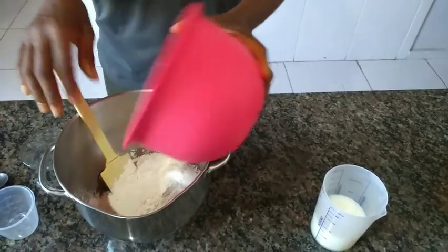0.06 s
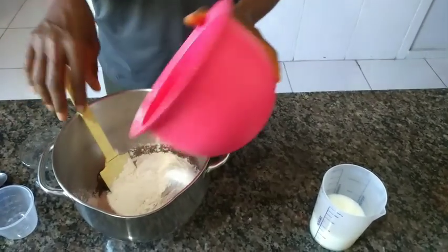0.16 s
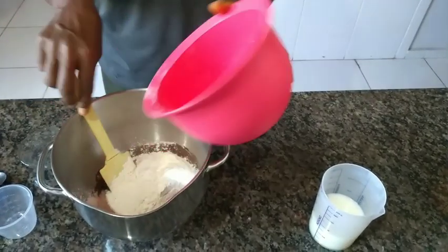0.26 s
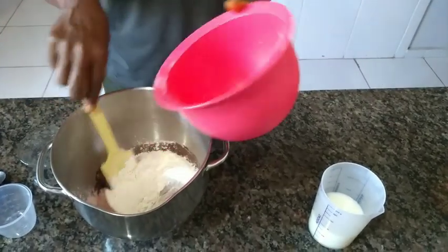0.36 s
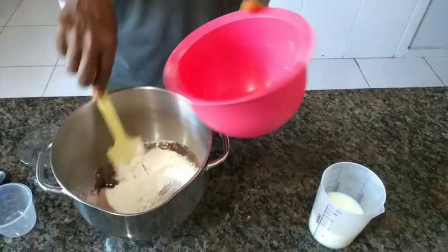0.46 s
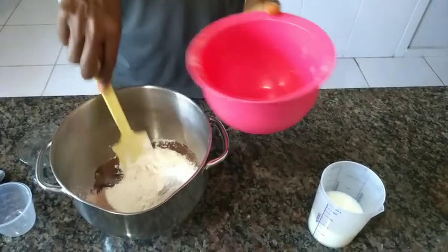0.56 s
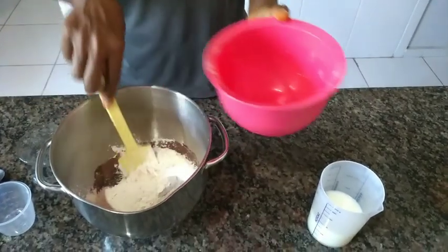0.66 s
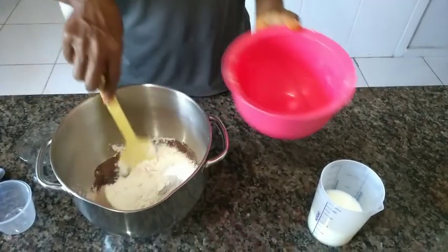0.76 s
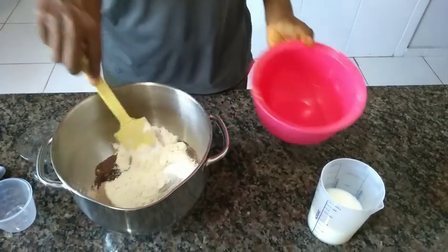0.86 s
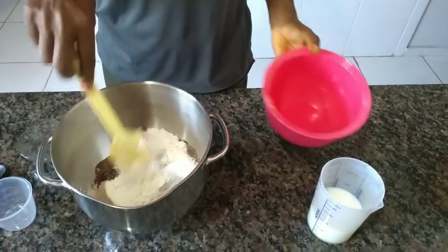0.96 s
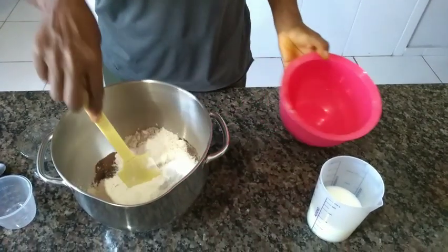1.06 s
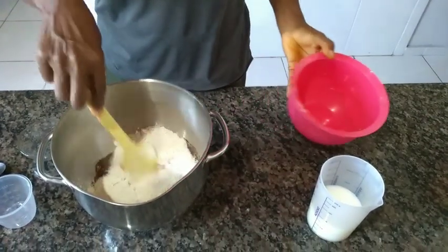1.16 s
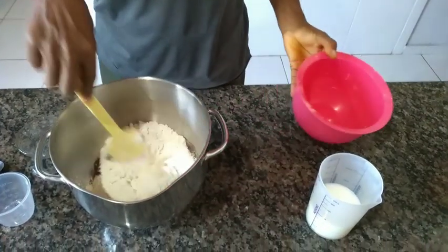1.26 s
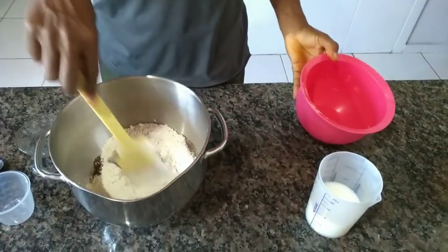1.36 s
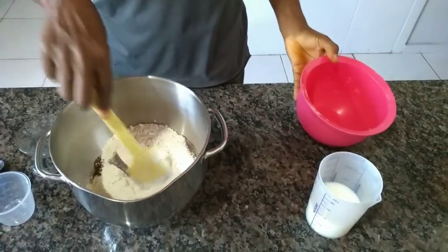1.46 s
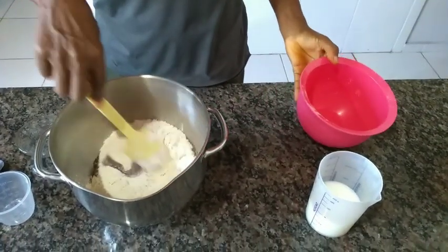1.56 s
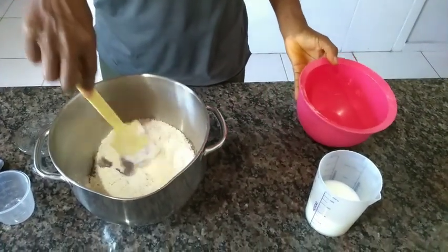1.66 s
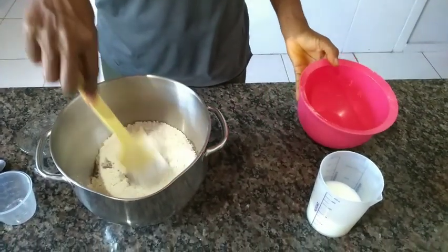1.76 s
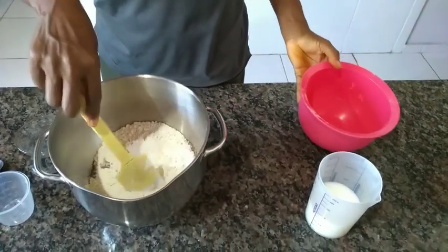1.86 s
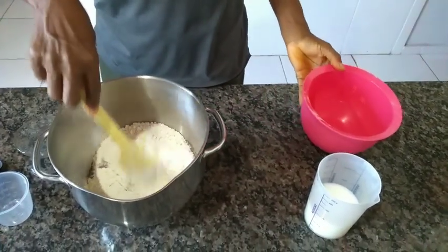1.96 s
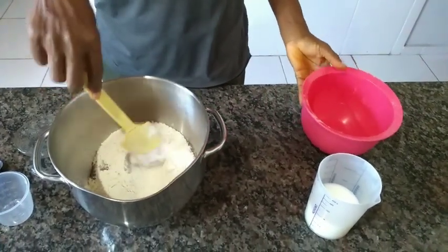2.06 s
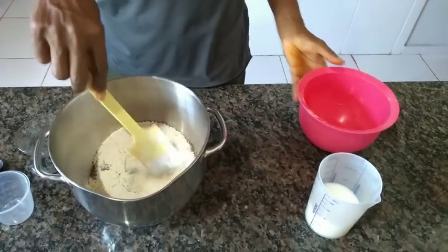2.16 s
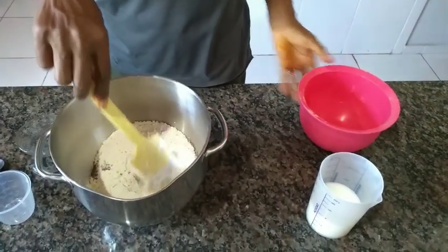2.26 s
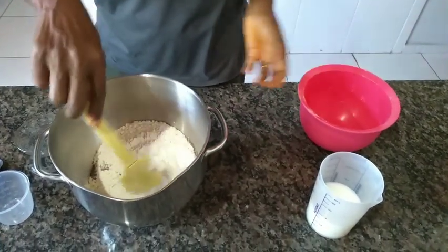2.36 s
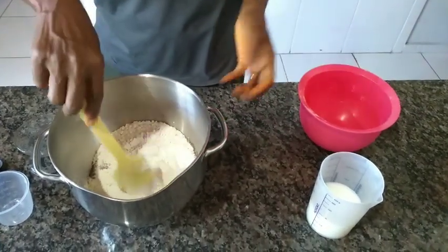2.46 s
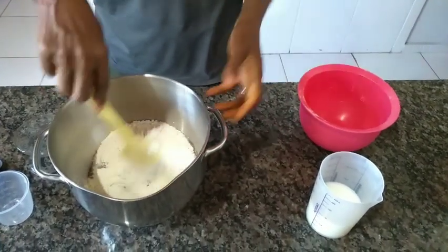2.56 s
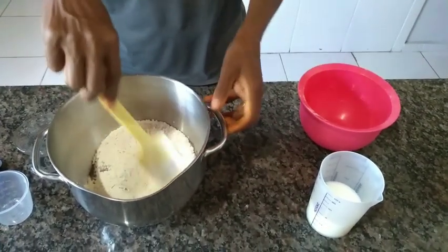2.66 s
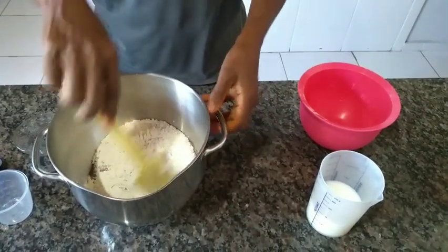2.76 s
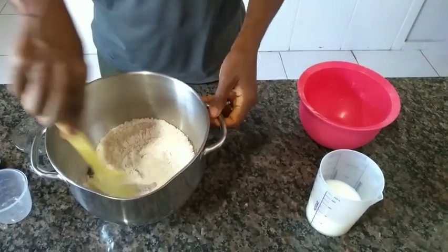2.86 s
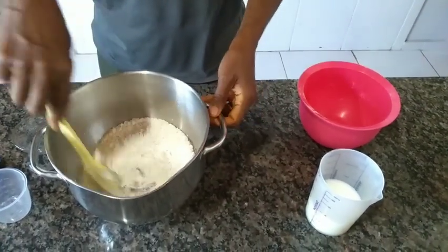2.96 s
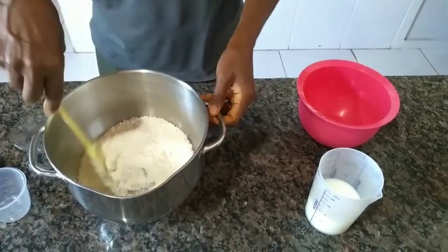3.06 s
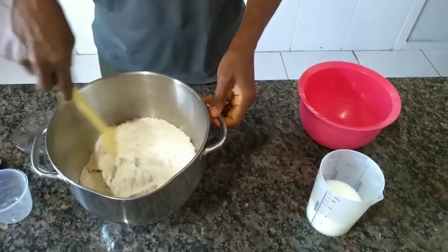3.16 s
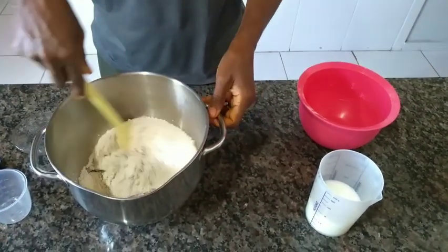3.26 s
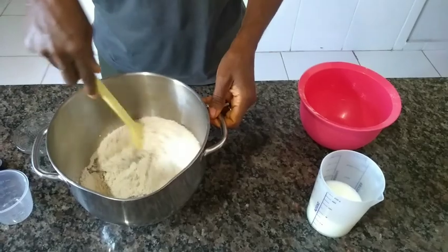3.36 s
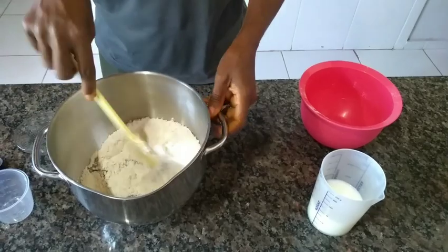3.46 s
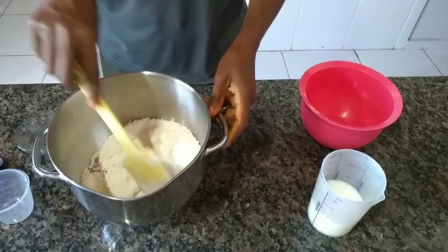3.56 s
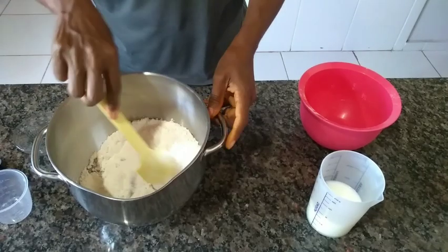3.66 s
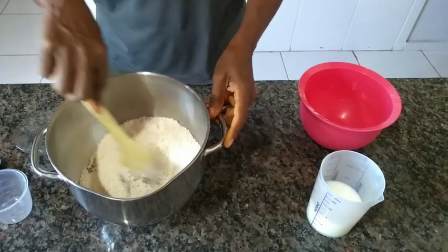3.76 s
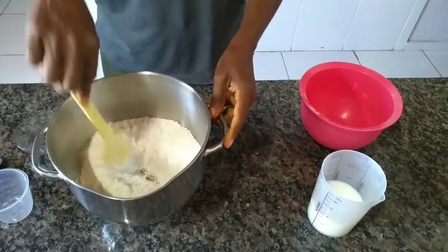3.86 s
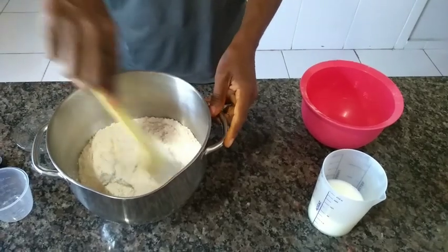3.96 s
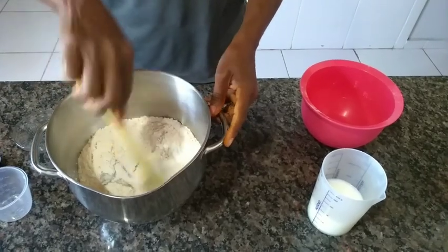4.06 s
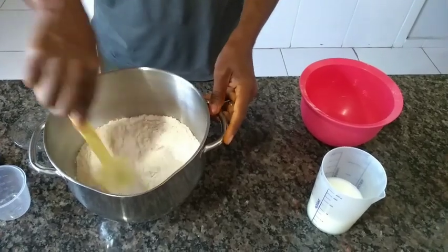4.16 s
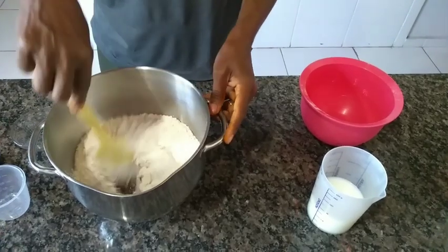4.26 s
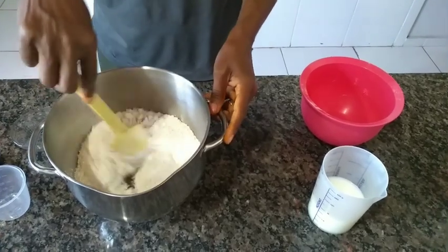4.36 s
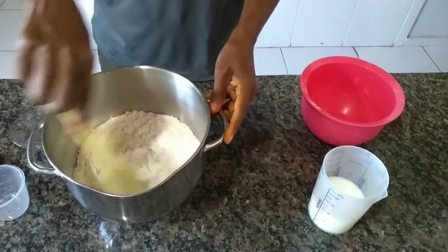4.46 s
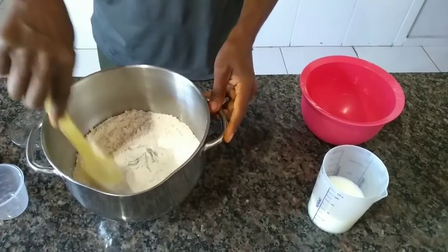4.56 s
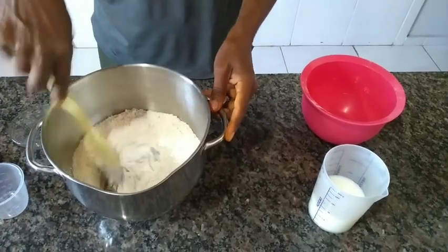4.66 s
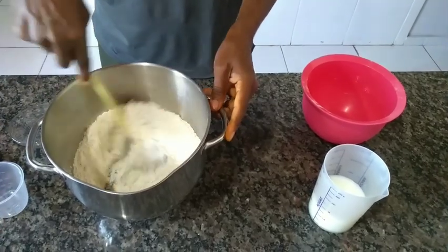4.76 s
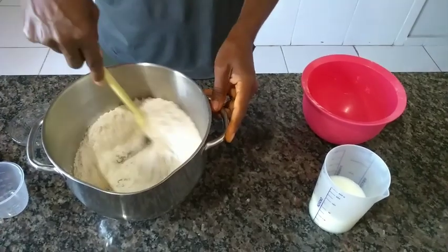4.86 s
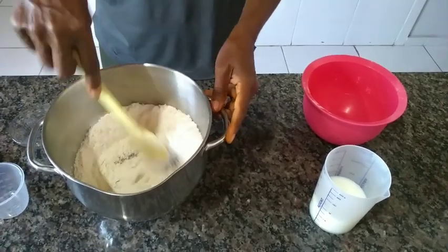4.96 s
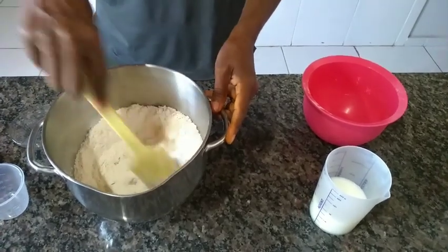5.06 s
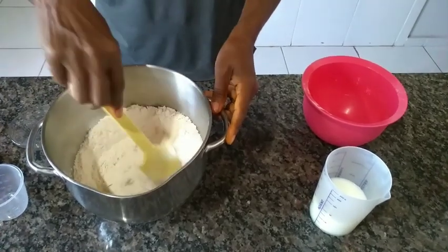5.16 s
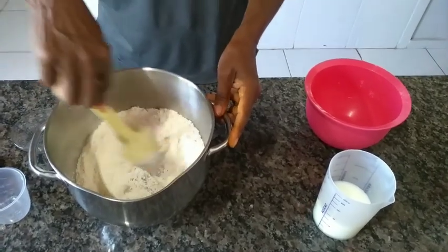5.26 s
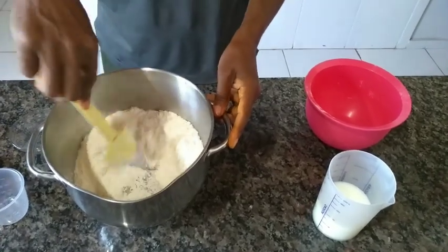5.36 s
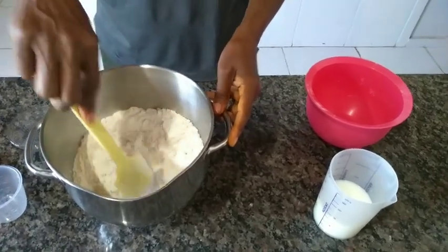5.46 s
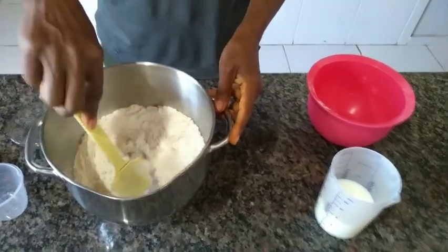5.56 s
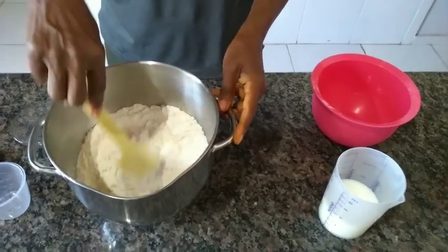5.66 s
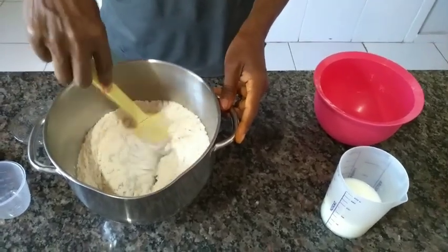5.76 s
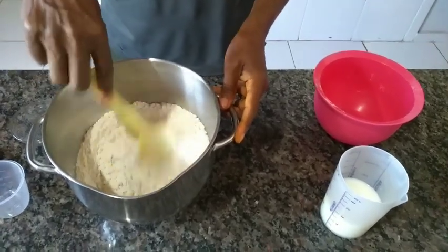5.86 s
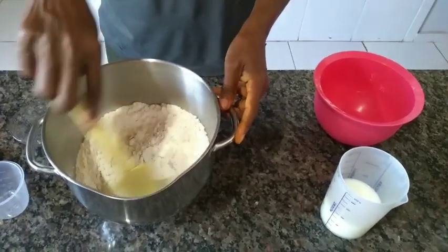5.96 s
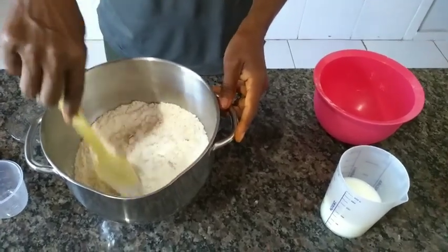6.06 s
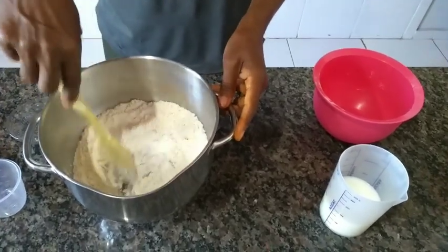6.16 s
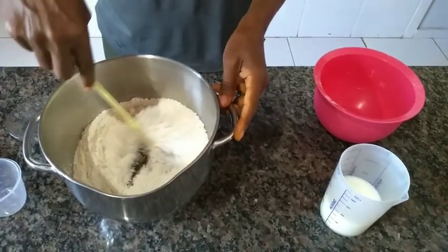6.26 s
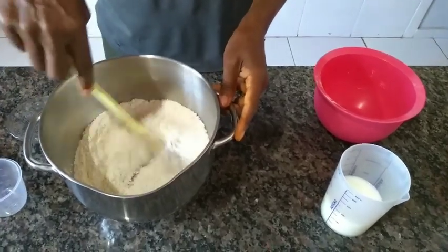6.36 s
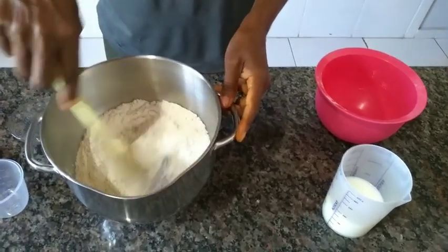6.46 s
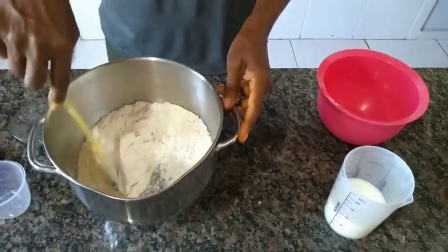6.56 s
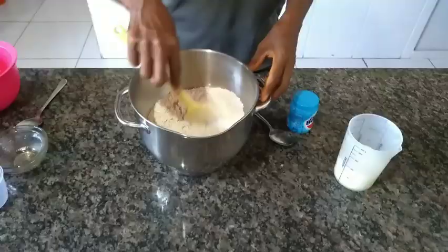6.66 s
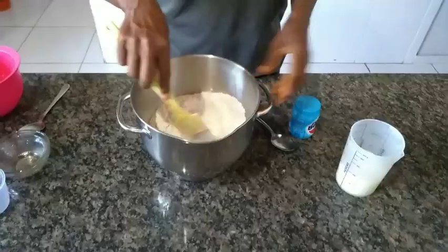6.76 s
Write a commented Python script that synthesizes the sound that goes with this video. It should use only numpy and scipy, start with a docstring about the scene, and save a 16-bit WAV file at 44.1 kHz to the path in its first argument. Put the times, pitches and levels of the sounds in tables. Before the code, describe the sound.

Appliance hum in a tiled kitchen; a hollow plastic bowl knocks down on stone, then a spatula thuds and scrapes through dry flour in a steel pot.

```python
"""An appliance hums in a tiled kitchen; soon something sinks softly into a heap of flour, then an emptied
plastic bowl is set down and let go on a stone counter and a hand takes the handle of a steel pot.
A spatula then stirs the dry flour: each landing excites damped modes, each stroke is dense frictional slips.
Two closely spaced phone ports, bumped once, turn the diffuse room field into two beams."""
import sys
import numpy as np
from scipy import signal
from scipy.fft import rfft, irfft, next_fast_len
from scipy.io import wavfile
from scipy.ndimage import uniform_filter1d

SR = 44100
rng = np.random.default_rng(int(sys.argv[2]) if len(sys.argv) > 2 else 0)


def transcribe(u):
    """Save the signal u as a 16-bit wav file named by the first command-line argument.

    u: samples, shape (n,) or (channels, n), limited to [-1, 1]; the rate is SR.
    q: integer samples, one column per channel.
    """
    v = np.clip(np.atleast_2d(u).T, -1, 1)
    q = np.round(v * 32767).astype(np.int16)
    wavfile.write(sys.argv[1], SR, q)


N = 300483
TIME = np.arange(N) / SR
BLOW_TIME = TIME[:SR * 3 // 5]
PORT_LAG_S = 21.4 / SR   # travel time of sound between the two ports

# swell of the deepest background: t/s, level/dB
DRONE_SWELL = [(0, -4.5), (1.2, 0), (2.4, 1), (2.7, 5), (4.2, 2), (5.3, -1), (5.8, -5), (6.8, -6.5)]
# dense modes of the pot's wall: f/Hz, relative spectral level/dB per Hz
WALL_SPECTRUM = [(500, -15), (800, -10), (960, -5.5), (1080, 0), (1170, 6), (1300, -1), (1420, -1),
                 (1550, -2), (1800, -17), (2100, 0), (2700, -20), (4500, -33)]
# flour crushed against steel: f/Hz, relative spectral level/dB per Hz
CRUNCH_SPECTRUM = [(2000, -16), (5800, -11), (6800, -0.5), (8500, 2), (9300, -18), (12500, -5),
                   (14000, -6.5)]


def from_db(db):
    """Amplitude gain is ten to the power of level over 20."""
    return 10 ** (np.asarray(db) / 20)


def decay(t, t60):
    """Exponential damping: the amplitude falls by 60 dB in t60 seconds."""
    return np.exp(-np.log(1000) * t / t60)


def build_up(tau_s):
    """First-order onset of a blow: the amplitude approaches 1 with time constant tau_s."""
    return 1 - np.exp(-BLOW_TIME / tau_s)


def rms_one(x):
    """Normalise the mean power, so that the rms is 1."""
    return x / np.sqrt(np.mean(x ** 2) + 1e-20)


def at_hz(points, hz):
    """Interpolate a table linearly along a logarithmic frequency axis."""
    freqs, values = np.transpose(points)
    return np.interp(np.log(hz + 1e-9), np.log(freqs), values)


def butter(x, hz, kind, order=2):
    """Causal Butterworth filter: maximally flat in its passband."""
    return signal.sosfilt(signal.butter(order, hz, kind, fs=SR, output="sos"), x + 1e-18)


def colour(x, spectrum):
    """Spectral shaping: multiply the Fourier transform by a tabled gain."""
    size = x.shape[-1]
    gain = from_db(at_hz(spectrum, np.fft.rfftfreq(size, 1 / SR)))
    return irfft(rfft(x) * gain, size)


def drift(rate):
    """Slow random fluctuation: straight lines between normal knots of spread 1, rate knots per second."""
    knots = np.arange(0, 8, 1 / rate)
    return np.interp(TIME, knots, rng.standard_normal(len(knots)))


def diffuse(size):
    """Diffuse-field coherence: noise at the two ports is alike in the bass and unrelated in the treble."""
    alike = np.sinc(2 * np.fft.rfftfreq(size, 1 / SR) * PORT_LAG_S)
    mid, side = rfft(rng.standard_normal((2, size)))
    spectra = np.sqrt((1 + alike) / 2) * mid + np.sqrt((1 - alike) / 2) * side * [[1], [-1]]
    return irfft(spectra, size)


def add(track, s, sound):
    """Superposition: sum a sound into a track from time s on."""
    start = round(s * SR)
    track[start:start + len(sound)] += sound[:N - start]


def ring(modes, favoured_hz, uneven_db, focus_db, reach_octaves):
    """Modal excitation: a blow favours modes near one pitch, by focus_db per octave within reach; peak 1."""
    hz, level_db, t60 = np.transpose(modes)[:, :, None]
    away = np.minimum(np.abs(np.log2(hz / favoured_hz)), reach_octaves)
    strength = from_db(level_db - focus_db * away + uneven_db * rng.standard_normal(hz.shape))
    partials = strength * decay(BLOW_TIME, t60) * np.sin(2 * np.pi * hz * BLOW_TIME)
    sound = np.sum(partials, axis=0)
    return sound / np.abs(sound).max()


def crack(spectrum, t60):
    """High modal density: modes too dense to tell apart act as decaying noise that starts at rms 1."""
    noise = colour(rng.standard_normal(len(BLOW_TIME)), spectrum)
    return rms_one(noise) * decay(BLOW_TIME, t60)


def grains(spectrum, per_s, spread_db):
    """Granular friction: random tiny slips of uneven size and either sign, coloured; rms 1."""
    occurs = rng.random(N) < per_s / SR
    size = from_db(spread_db * rng.standard_normal(N))
    return rms_one(colour(occurs * rng.choice([-1, 1], N) * size, spectrum))


def air():
    """Diffuse sound field: coloured air noise of the kitchen arrives from all sides."""
    # f/Hz, relative spectral level/dB per Hz
    air_spectrum = [(40, -103), (100, -99), (200, -85.5), (300, -88.5), (450, -90.5), (560, -93),
                    (800, -94), (1200, -96.5), (2000, -94.5), (3000, -101), (4300, -105), (5200, -104),
                    (9000, -109.3), (14000, -113.5)]
    return from_db(-0.57) * colour(diffuse(N), air_spectrum) * np.sqrt(SR / 2)


def rumble():
    """Narrow-band noise: a deep rumble, unrelated on the two sides, follows the drone's swell."""
    level_db = np.interp(TIME, *np.transpose(DRONE_SWELL)) - 74.5
    return from_db(level_db) * rms_one(butter(rng.standard_normal((2, N)), [48, 74], "band"))


def hum_lines():
    """Standing waves give motor, fan and mains lines unequal level and phase on the two sides."""
    # f/Hz, relative left level/dB, relative right level/dB, right phase lag/rad
    lines = [(47.7, -78.5, -76.5, 3), (59.4, -68.5, -62.5, 1.2), (71.5, -70.5, -70, 2.5),
             (96, -66.5, -65, 3), (119, -63.5, -60.5, -2), (120.3, -72, -68, 2.5), (144, -66.5, -67, 2.77),
             (178.3, -69, -55.5, 0.45), (236.5, -78.5, -68, 1.0), (535, -73.5, -80.5, -0.55)]
    out, drone = np.zeros((2, N)), np.interp(TIME, *np.transpose(DRONE_SWELL))
    for hz, left_db, right_db, lag in lines:
        phase = 2 * np.pi * (hz * TIME + rng.random()) + 0.069 * drift(4.9)
        swell_db = drone * min(1, 60 / hz) ** 2 + 0.66 * drift(4.5)   # the drone moves the bass most
        level = from_db(np.array([[left_db], [right_db]]) - 0.5 + swell_db)
        out += np.sqrt(2) * level * np.sin(phase - np.array([[0], [lag]]))
    return out


def air_rush():
    """Room resonance: the appliance's rush of air is heard as noise bands at the standing waves."""
    # f/Hz, bandwidth/Hz, left level/dB, right level/dB
    room_modes = [(120, 30, -76, -73), (158.3, 26, -78.5, -72.5), (225.6, 10, -64, -70),
                  (305, 9.4, -73, -67.5), (355.9, 12, -74, -70), (461, 29, -78, -71), (708, 30, -78.5, -74)]
    out = np.zeros((2, N))
    for hz, width, left_db, right_db in room_modes:
        band = butter(rng.standard_normal(N), [hz - width / 2, hz + width / 2], "band")
        out += from_db([[left_db], [right_db]]) * rms_one(band)
    return out


def whine():
    """Tonal radiation: thin, high sinusoids waver a little in level and phase, alike on both sides."""
    # f/Hz, relative level/dB
    tones = [(4802, -81.5), (5098, -101), (5157, -108.5), (5216, -93)]
    out = np.zeros(N)
    for hz, db in tones:
        level = from_db(db - 5.5 + 0.9 * drift(2.2))
        out += np.sqrt(2) * level * np.sin(2 * np.pi * hz * TIME + 0.5 * drift(3.6))
    return out


def lulls():
    """Amplitude modulation: the gain of hum and air is steady but for a few soft-edged dips."""
    # t/s, duration/s, level/dB
    dips = [(1.68, 0.26, -1), (1.983, 0.15, -3.5), (4.246, 0.28, -2), (5.28, 0.47, -1.46),
            (5.727, 0.25, -4.5)]
    edge_s = 0.066
    dip_db = np.zeros(N)
    for s, length, db in dips:
        inside = np.minimum(TIME - s, s + length - TIME)
        dip_db += db * np.clip(inside / edge_s + .5, 0, 1)
    return from_db(dip_db)


def kitchen(source, wet_db):
    """Reverberation: after the direct sound a diffuse tail decays at its own rate in each octave band."""
    # decay of the tiled room: f/Hz, t60/s
    room_decay = [(150, 0.72), (500, 0.69), (1400, 0.51), (3700, 0.84), (8000, 0.45), (12000, 0.24)]
    t, noise = TIME[:SR], rfft(diffuse(SR))
    hz = np.fft.rfftfreq(SR, 1 / SR)
    edges = 45 * 2. ** np.arange(10)
    tail = 0
    for low, high in zip(edges, edges[1:]):
        band = irfft(noise * ((hz >= low) & (hz < high)), SR)
        tail = tail + band * decay(t, at_hz(room_decay, np.sqrt(low * high)))
    onset = np.clip(t / 0.0026 - .5, 0, 1)   # silent for 1.3 ms, full at 3.9 ms
    tail = tail * onset * from_db(wet_db) / np.sqrt(SR / 20)
    return source + signal.fftconvolve(np.atleast_2d(source), tail, axes=1)[:, :N]


def bumps(right_db=-22):
    """Structure-borne shock: a jolt through the phone's case, mostly at the left port, and a faint rattle."""
    # t/s, relative level/dB
    shocks = [(2.5612, -25)]
    rattle_spectrum = [(2000, -2), (6500, 6.0), (12000, 2.0)]   # f/Hz, relative spectral level/dB per Hz
    jolts, rattle, t = np.zeros(N), np.zeros((2, N)), TIME[:SR // 10]
    for s, db in shocks:
        jolt = np.exp(-t / 0.00094) + 0.35 * np.exp(-t / 0.001)
        jolt = butter(butter(jolt, 5200, "low"), 22, "high", order=1)
        add(jolts, s, from_db(db + 11.5) * jolt)
        for port in rattle:
            add(port, s + .006, from_db(db - 23) * crack(rattle_spectrum, t60=0.06))
    return jolts * from_db([[0], [right_db]]) + rattle


def phone(ports, cross_hz=5200, lift_hz=470):
    """Pressure-gradient beams: each port minus the delayed other one, with the lost bass lifted again."""
    size = next_fast_len(N + SR // 4)
    hz, spectra = np.fft.rfftfreq(size, 1 / SR), rfft(ports, size)
    cross = np.exp(-2j * np.pi * hz * PORT_LAG_S) / (1 + (hz / cross_hz) ** 2)
    lift = (lift_hz + 1j * hz) / (25 + 1j * hz)
    beams = irfft((spectra - cross * spectra[::-1]) * lift / np.sqrt(2), size)[:, :N]
    return butter(beams, 45.3, "high", order=6)


def bowl():
    """Shell vibration: plastic knocks and rings hollowly, its rim clacks and ticks under the fingers."""
    # contacts with the counter: t/s, relative level/dB, favoured f/Hz, rim level/dB relative to that
    contacts = [(1.3603, -24.5, 800, -21), (1.3848, -32.5, 760, -38), (1.397, -42.5, 724, -33),
                (2.148, -40.5, 680, -15), (2.2064, -22, 647, -18)]
    # short-lived shell and longer hollow cluster: f/Hz, relative level/dB, t60/s
    shell_modes = [(141.6, -8, 0.21), (298, -8, 0.11), (435, -2, .09), (472, -3, .06), (622, -9, .2),
                   (648, -22, .6), (668, 0, .04), (702, -26, .95), (724, -16, .6), (738, 4, .05),
                   (760, -23, .8), (803, -21, .75), (855, -1, .035), (1155, -1, .06), (1540, -11, 0.044)]
    # dense rim modes: f/Hz, relative spectral level/dB per Hz
    rim_spectrum = [(600, -27), (1300, -5.5), (1900, 10), (2500, 3), (3100, -12), (3700, -8.5), (4500, -20),
                    (8000, -25), (14000, -40)]
    # blur of close resonances around the cluster: f/Hz, relative spectral level/dB per Hz
    hollow_spectrum = [(300, -24), (470, -12), (550, -15), (630, -2), (730, 0), (800, -3), (900, -20),
                       (1500, -45)]
    # fingers shifting on the rim: t/s, relative level/dB
    finger_ticks = [(1.583, -60), (1.9487, -56)]
    shell_lag_s = 0.00056   # the edge touches first
    out = np.zeros(N)
    flex = build_up(0.0012)   # soft plastic takes a moment to move
    bloom = build_up(.03)
    for s, db, hz, rim_db in contacts:
        knock = ring(shell_modes, hz, uneven_db=0.8, focus_db=27.5, reach_octaves=0.3) * flex
        add(out, s + shell_lag_s, from_db(db + 6.0) * knock)
        add(out, s, from_db(db - 21.5) * crack(hollow_spectrum, t60=.85) * bloom)
        add(out, s, from_db(db + rim_db + 2) * crack(rim_spectrum, t60=0.043))
    for s, db in finger_ticks:
        add(out, s, from_db(db + 5.5) * crack(rim_spectrum, t60=0.036))
    return out


def inside_pot(source, direct_db=-5.0, bounced_db=-3.0, t60=0.024, turns_per_s=2.3):
    """Diffraction and reflection: the rim dulls the direct sound; wall bounces fade in and out as paths turn."""
    t = TIME[:SR // 25]
    direct_gain = from_db(direct_db)   # reached in the treble; the bass passes over the rim in full
    out = direct_gain * source + (1 - direct_gain) * butter(source, 910, "low", order=1)
    angle = 2 * np.pi * turns_per_s * TIME
    for share in np.cos(angle), np.sin(angle):
        bounces = butter(diffuse(len(t)) * decay(t, t60), 850, "high")
        bounces = from_db(bounced_db) * rms_one(bounces) / np.sqrt(len(t))
        out = out + signal.fftconvolve((share * source)[None], bounces, axes=1)[:, :N]
    return out


def handle():
    """Bright modal ringing: the steel loop rattles briefly under the hand and rings on."""
    # hand meeting the handle: t/s, relative level/dB
    contacts = [(2.791, -37), (2.7964, -39.5), (2.8104, -40)]
    # f/Hz, relative spectral level/dB per Hz
    rattle_spectrum = [(800, -7), (1500, -7), (2600, 4.5), (3200, -15), (4400, 4), (6200, -9), (8000, 4.5),
                       (9000, -16), (14000, -17)]
    # f/Hz, relative level/dB, t60/s
    loop_modes = [(1940, 0, .03), (2600, -1, .09), (3480, -7, .035), (3720, -5, .03), (4670, -3, .04),
                  (5120, -8, .035), (5940, 0, .03), (6440, 1, .03), (7050, -1, .025), (7730, 0, .025)]
    out = np.zeros(N)
    for s, db in contacts:
        add(out, s, from_db(db - 5.5) * crack(rattle_spectrum, t60=0.037))
        tone = ring(loop_modes, 4700, uneven_db=1.0, focus_db=2.0, reach_octaves=1.5)
        add(out, s, from_db(db + 2.0) * tone)
    return out


def press():
    """Absorption in powder: the blade sinks gently into the heap, whose give is muffled noise."""
    # t/s, level/dB
    push_in = (.684, -42)
    # f/Hz, relative spectral level/dB per Hz
    heap_spectrum = [(150, -15), (300, -6), (470, 3), (650, -8.5), (1000, -20), (3000, -40)]
    out, (s, db) = np.zeros(N), push_in
    add(out, s, from_db(db) * crack(heap_spectrum, t60=.14) * build_up(0.013))
    return out


def landings():
    """Mass loading and damping: flour shifts the thudding base's modes as wall rattles and grains crush."""
    # t/s, relative thud level/dB, favoured f/Hz, pitch factor, ring time factor,
    # relative wall level/dB, relative crunch level/dB
    blows = [(2.839, -41.5, 301, 0.81, .5, -51.5, -45), (2.862, -55, 400, 0.95, .5, -60, -48),
             (2.980, -60, 400, .9, 0.45, -63, -52), (3.284, -54, 487, 1, 0.45, -53, -54),
             (3.627, -34, 330, 0.99, 0.43, -43.5, -53), (4.062, -37.5, 260, 0.9, 0.68, -52, -58),
             (4.141, -56, 298, 0.79, .5, -56, -58), (4.4957, -29.5, 410, .99, 1.2, -53, -48),
             (4.551, -45, 440, 1.1, .5, -63, -52), (5.1106, -38, 310, 0.77, 0.48, -40.5, -56),
             (5.1232, -44, 330, 0.67, .6, -49, -56), (5.335, -50, 480, 1.1, .6, -64, -72),
             (5.566, -57, 300, 0.81, .5, -59, -58), (5.972, -40, 300, 0.87, .5, -56, -43.5),
             (6.0375, -53, 300, .9, .5, -57, -66), (6.074, -45, 283, .8, 0.58, -43.5, -69),
             (6.525, -42, 230, 0.85, 0.57, -56, -56), (6.567, -45, 301, 1.05, .5, -62, -64),
             (6.59, -50, 300, 0.71, 0.42, -62, -58)]
    # base modes before each blow's factors: f/Hz, relative level/dB, t60/s
    base_modes = [(205, 1.5, 0.024), (264, 10, 0.028), (331, 1, 0.038), (403.3, -5.5, 0.13),
                  (438.2, -8.5, .22), (468.5, -7.5, 0.12), (606, -3, 0.048), (765, -9, 0.046),
                  (922, -14.5, 0.069)]
    thud_lag_s = .0016   # the heavier body answers a moment later
    out = np.zeros(N)
    cushion = build_up(0.00055)   # powder softens the first instant
    give = build_up(0.0014)   # the blade bends before its weight arrives
    for s, thud_db, hz, pitch, sustain, wall_db, crunch_db in blows:
        loaded = np.array(base_modes) * [pitch, 1, sustain]
        thud = ring(loaded, hz, uneven_db=1.97, focus_db=10, reach_octaves=0.54) * give
        add(out, s + thud_lag_s, from_db(thud_db + 9.0) * thud)
        add(out, s + 0.0008, from_db(wall_db + 3.0) * crack(WALL_SPECTRUM, t60=0.024) * cushion)
        add(out, s + 0.00068, from_db(crunch_db + 5.5) * crack(CRUNCH_SPECTRUM, t60=0.017) * cushion)
    return out


def scraping():
    """Sliding friction: under trembling pressure powder hisses, lumps burst, blade rubs and wall chatters."""
    # pushes of the blade: t/s, duration/s, rise time/s, relative hiss level/dB, relative rub level/dB,
    # relative chatter level/dB, fade/dB per s
    strokes = [(2.835, 0.06, 0.0088, -56, -58, -62, 60), (2.897, .31, 0.087, -58.5, -59.5, -68, 39),
               (3.204, 0.095, .07, -63, -64, -69, 4), (3.624, 0.034, 0.035, -52, -56, -57.5, 9),
               (3.768, 0.036, .03, -69, -79, -78, 0), (4.054, 0.14, 0.091, -57, -61.5, -65.5, 10),
               (4.494, 0.37, .006, -61, -56, -67, 25), (4.722, 0.023, 0.022, -71, -67, -77, 0),
               (5.111, 0.023, 0.016, -53.5, -52.5, -52.5, 28), (5.15, 0.033, 0.022, -62, -65, -64, 45),
               (5.976, 0.23, .005, -63, -57, -70, 40), (6.04, 0.032, 0.029, -68, -66, -64, 0),
               (6.524, 0.13, 0.029, -61.5, -60, -67.5, 27)]
    # powder under the blade: f/Hz, relative spectral level/dB per Hz
    hiss_spectrum = [(1500, -3.5), (3000, -5.5), (5800, -6.5), (6600, 1.5), (7600, 2), (8500, 4.5),
                     (9300, -3), (12500, -1.5), (14000, -12)]
    # blade on steel: f/Hz, relative spectral level/dB per Hz
    rub_spectrum = [(110, -14), (200, 6.5), (450, 6), (600, 4.5), (850, -4), (1170, -3.5), (1550, -9),
                    (2000, 0.5), (3000, -14.5), (5000, -35)]
    release_s, rub_rise_s = 0.011, 0.0094   # the blade comes to rest; it bears on the steel
    rub_fade_db_per_s = 13   # extra fade of rub and chatter as flour gets under the blade
    hiss, rub, chatter = np.zeros((3, N))
    for s, length, rise, hiss_db, rub_db, wall_db, fade in strokes:
        t = np.maximum(TIME - s, 0)
        push = from_db(-fade * t) * np.exp(-np.maximum(t - length, 0) / release_s)
        bearing = push * from_db(-rub_fade_db_per_s * t) * np.minimum(t / rub_rise_s, 1)
        hiss += push * from_db(hiss_db) * np.sqrt(np.minimum(t / rise, 1))
        rub += bearing * from_db(rub_db)
        chatter += bearing * from_db(wall_db)
    pressure = from_db(1.8 * drift(90) + 1.0 * drift(25.03))
    lumps = from_db(-4.5) * grains(CRUNCH_SPECTRUM, per_s=75, spread_db=3.0)
    powder = grains(hiss_spectrum, per_s=1500, spread_db=2.0) + lumps
    steel = grains(rub_spectrum, per_s=1800, spread_db=4.5)
    wall = grains(WALL_SPECTRUM, per_s=900, spread_db=2.5)
    return pressure * (hiss * powder + rub * steel + chatter * wall)


def scene():
    """Linear superposition: bowl, pot, bump and air pass the two ports; hum and rumble are summed after."""
    background = lulls()
    hum = hum_lines() + air_rush() + whine()
    pot = kitchen(inside_pot(landings() + handle() + scraping() + press()), wet_db=-3.0)
    ports = kitchen(bowl(), wet_db=-4.2) + pot + bumps() + background * air()
    return phone(ports) + background * hum + rumble()


def record(dry):
    """Band limitation: a steep low-pass cuts the top; the sound drops out for a moment near the end."""
    # start t/s, end t/s
    dropout = (6.695, 6.775)
    dropout_db, cutoff_hz = -57, 14250
    muted = uniform_filter1d(1. * ((TIME > dropout[0]) & (TIME < dropout[1])), size=300)   # soft edges
    low_pass = signal.ellip(12, .1, 80, cutoff_hz, fs=SR, output="sos")
    return signal.sosfilt(low_pass, dry * from_db(dropout_db * muted))


dry = scene()
out = record(dry)
transcribe(out)
```